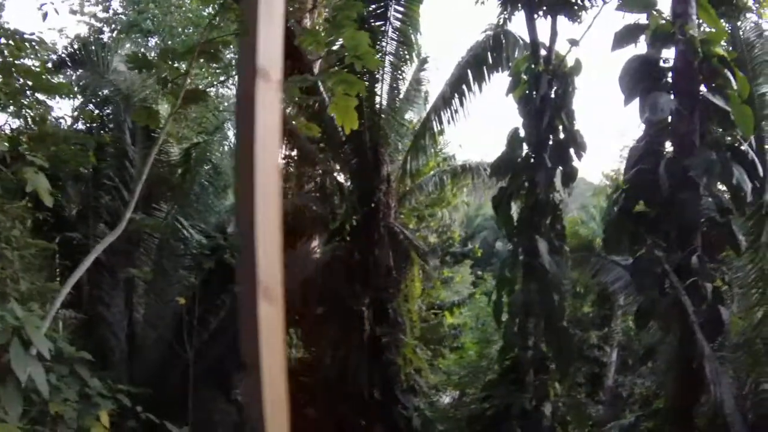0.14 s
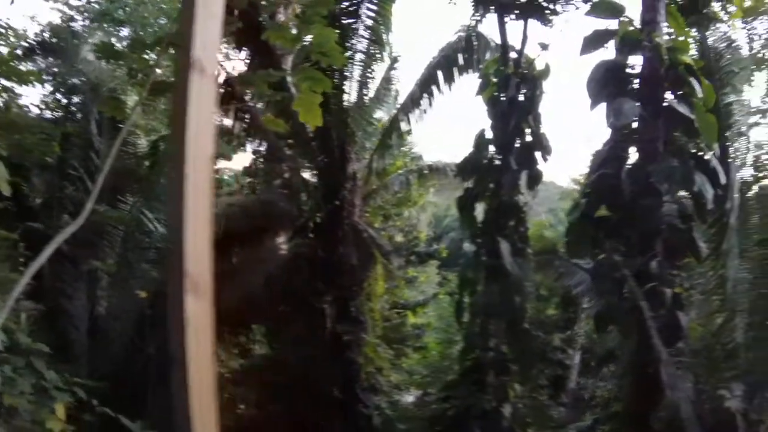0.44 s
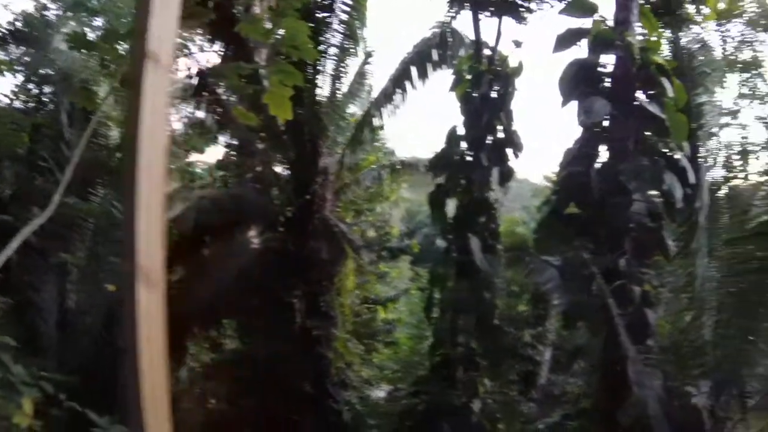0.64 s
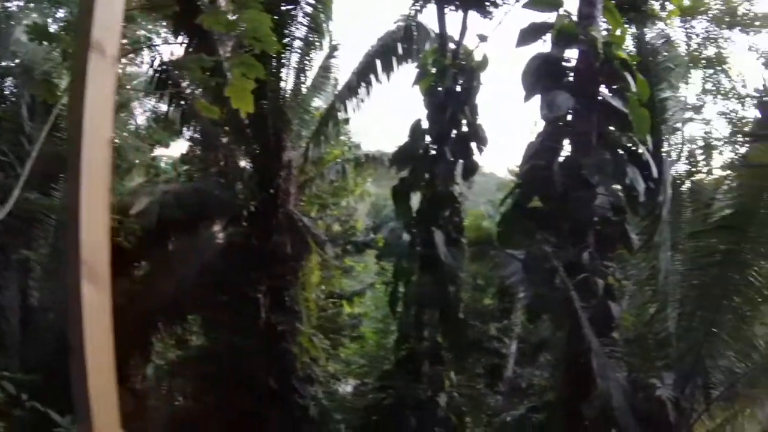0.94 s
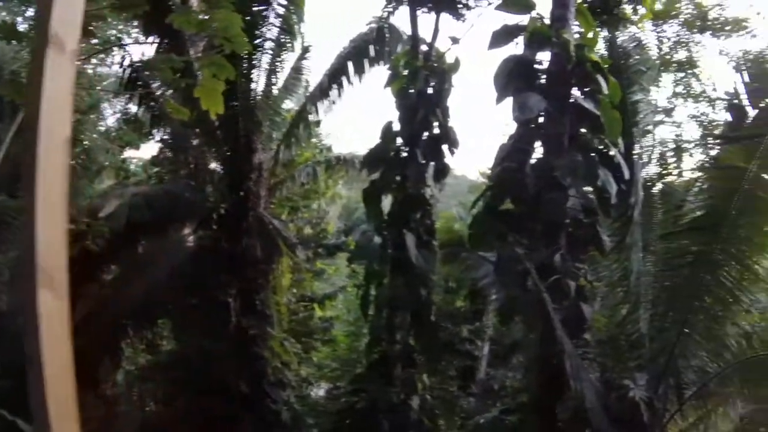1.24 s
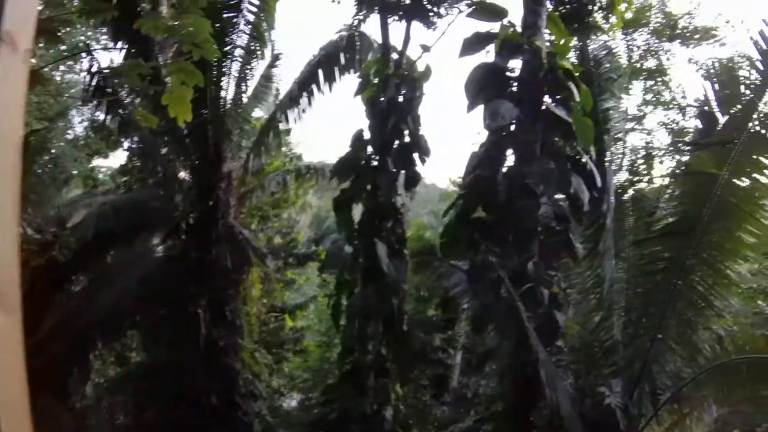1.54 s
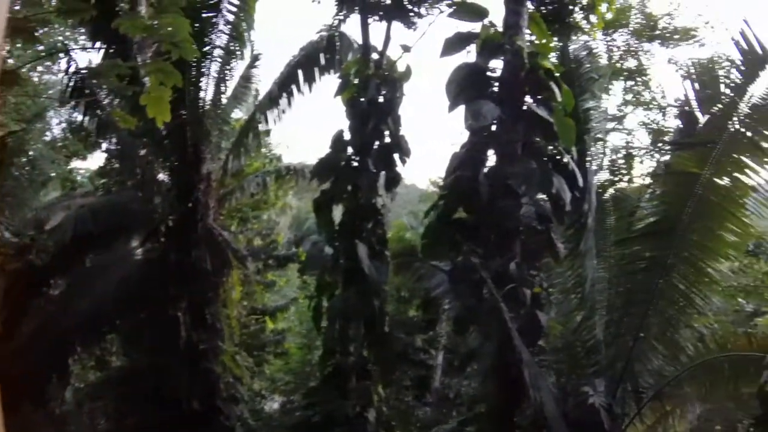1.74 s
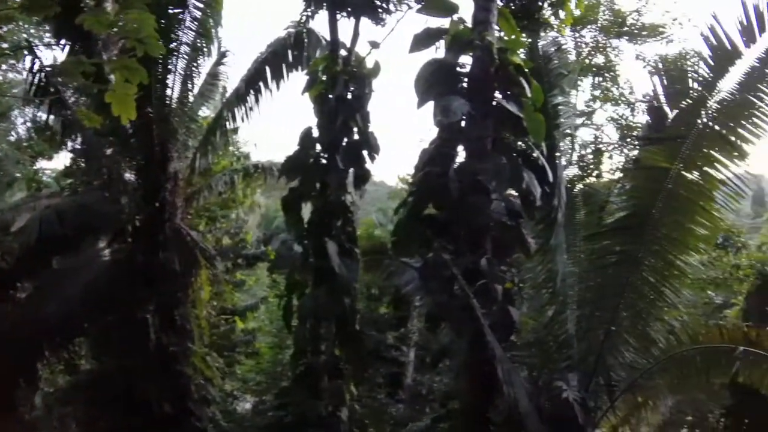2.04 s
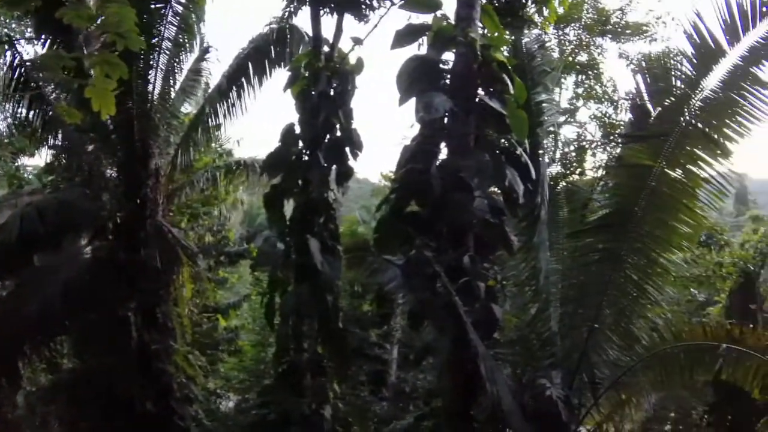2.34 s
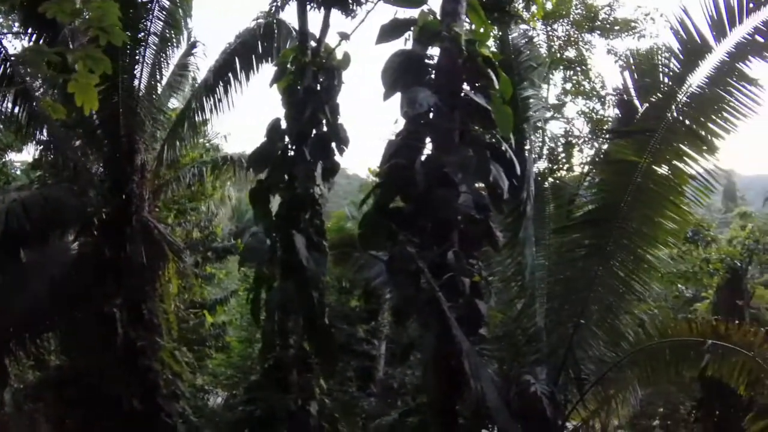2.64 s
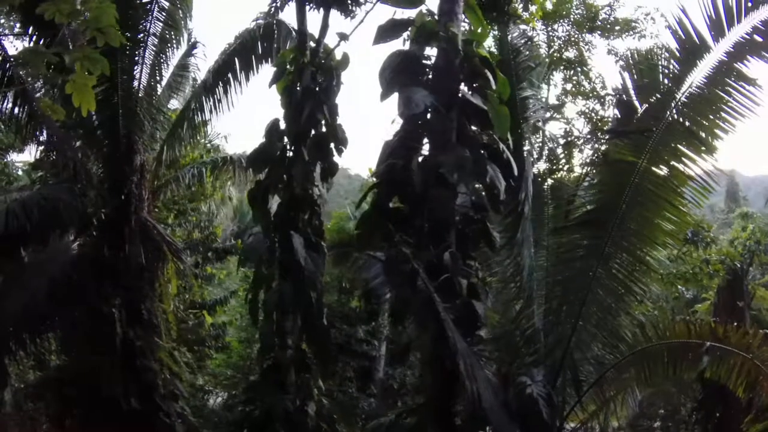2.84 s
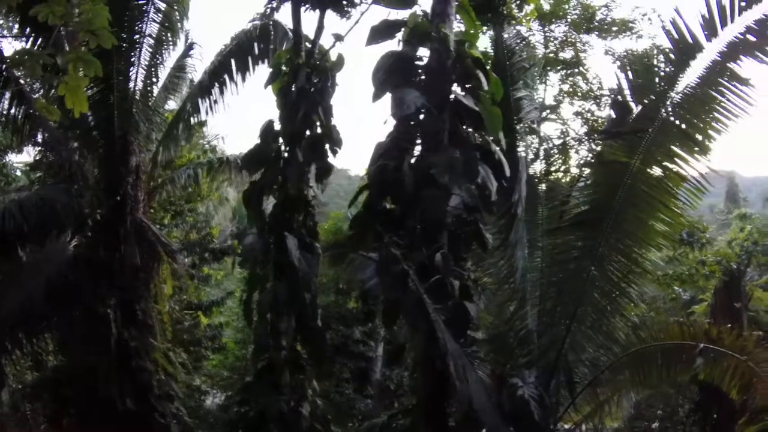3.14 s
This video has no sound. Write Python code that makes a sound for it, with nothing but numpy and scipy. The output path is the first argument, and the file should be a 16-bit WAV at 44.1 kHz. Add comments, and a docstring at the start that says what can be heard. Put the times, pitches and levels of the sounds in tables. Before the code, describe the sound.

Distant howler monkeys roar hoarsely and hoot over a steady, piercing insect drone in tropical forest

```python
"""Howler monkeys in a tropical forest

Far-off monkeys give hoarse roars (rough flaps and air ringing a throat) and hoots (unsteady tones),
both smeared by the trees. Insects drone near 2 kHz as fluttering tones; higher cicadas and crickets
shimmer as coloured noise. Broad noise makes the forest's wash and the low rumble of a hand-held camera,
and fading low sines make its few soft bumps."""
import sys
import numpy as np
from scipy import signal
from scipy.fft import rfft, irfft, next_fast_len
from scipy.io import wavfile
from scipy.ndimage import map_coordinates

SR = 44100
rng = np.random.default_rng(int(sys.argv[2]) if len(sys.argv) > 2 else 0)


def pcm_store(signal):
    """Save signal as 16-bit PCM."""
    levels = np.round(np.clip(np.atleast_2d(signal), -1, 1) * 32767)
    wavfile.write(sys.argv[1], SR, levels.astype(np.int16).T)


N = 144648


def amp(db):
    """Turn decibels into a gain."""
    return 10 ** (np.asarray(db) / 20)


def unit(x):
    """Scale a sound to an average strength (rms) of 1."""
    return x / np.sqrt(np.mean(np.abs(x) ** 2) + 1e-20)


def clock():
    """Give the time of each sample in seconds."""
    return np.arange(N) / SR


def along(points, hz):
    """Read between (frequency, value) points, with frequency on a log axis."""
    f, v = np.transpose(points)
    return np.interp(np.log(hz + 1), np.log(f + 1), v)


def curve(rows):
    """Join (seconds, value) points with straight lines, one value per sample."""
    return np.interp(clock(), *np.transpose(rows))


def wobble(rate):
    """Draw a smooth random curve through `rate` random knots a second."""
    return map_coordinates(rng.standard_normal(4096), [clock() * rate], mode="wrap")


def filtered(x, response):
    """Multiply the spectrum of x by a response that depends on frequency."""
    m = next_fast_len(N + SR // 2)
    return irfft(rfft(x, m) * response(np.fft.rfftfreq(m, 1 / SR)), m)[:N]


def noise(spectrum):
    """Colour white noise with (Hz, dB) points, then scale it to rms 1."""
    return unit(filtered(rng.standard_normal(N), lambda hz: amp(along(spectrum, hz))))


def tone(pitch_hz, spread_hz, rough):
    """Make a tone of rms 1 whose rough share flutters at random in level and phase."""
    m = next_fast_len(N)
    # Slow random flutter: a wider bell in frequency makes it faster
    bell = np.exp(-(np.fft.fftfreq(m, 1 / SR) / (2 * spread_hz)) ** 4)
    random_spectrum = rng.standard_normal(m) + 1j * rng.standard_normal(m)
    flutter = unit(np.fft.ifft(bell * random_spectrum)[:N])
    share = np.clip(rough, 0, 1)
    turns = np.cumsum(pitch_hz * np.ones(N)) / SR + rng.random()
    steady_and_rough = np.sqrt(1 - share) + np.sqrt(share) * flutter
    return unit(np.real(steady_and_rough * np.exp(2j * np.pi * turns)))


def swell(start, length):
    """Shape one call: a straight rise, a hold, then an exponential release."""
    attack_s, release_s = 0.035, 0.031  # release: time to fall to 37 %
    t = clock() - start
    return np.clip(t / attack_s, 0, 1) * np.exp(-np.maximum(t - length, 0) / release_s)


def throat(x, resonances):
    """Ring x through steep-sided resonances, as air in a throat does, at rms 1."""
    def ring(f, hz, width):
        # Squaring makes the sides steeper
        return (1j * f * width / (hz * hz - f * f + 1j * f * width)) ** 2

    def response(f):
        power = sum(np.abs(amp(db) * ring(f, hz, width)) ** 2 for hz, width, db in resonances)
        return np.sqrt(power)

    return unit(filtered(x, response))


def roars():
    """Irregular flaps of the vocal folds and rushing air ring the throat, tuned anew for each roar."""
    # Hoarse roars. Each row: start in seconds, length in seconds, level in dB,
    # middle over lower resonances in dB, upper over lower resonances in dB, main resonance in Hz.
    roar_rows = [(-.05, 0.094, -40.5, -3.5, 8.5, 681), (.06, .2, -53.5, -1, 2.5, 657.4),
                 (1.897, 0.071, -40, -4.5, 6, 659.2), (1.97, 0.13, -44, 1.5, 7, 681),
                 (2.083, 0.1, -38, -11, -1, 667), (2.23, 0.11, -51.5, 1, -6.5, 701),
                 (2.912, .09, -36.5, -3.5, -0.5, 653.5), (3.038, 0.12, -44.5, -1, -4, 653.4),
                 (3.128, .17, -35, -6, 2, 652.6)]
    # Throat resonances before each roar retunes them.
    # Each row: frequency in Hz, width in Hz before the sides are steepened, relative level in dB.
    low_rows = [(481, 150, -1.5), (579, 120, -3), (657, 59, 3.5), (796, 220, -9)]
    mid_rows = [(950, 50, -9), (1040, 80, -2), (1140, 70, 0), (1265, 60, -8)]
    high_rows = [(1545, 60, -9), (1630, 60, -2), (1765, 85, 0), (1900, 70, -10)]
    flap_hz, scatter_cycles, air = 94.3, 0.1518, 0.79  # air: rms beside flaps of rms 1
    untuned_hz = 660  # main resonance before retuning

    count = 1024
    times = (np.arange(count) + scatter_cycles * rng.standard_normal(count)) / flap_hz
    sizes = amp(2 * rng.standard_normal(count))
    flaps = np.bincount(np.abs(times * SR).astype(int), sizes, N)[:N]
    rasp = unit(flaps) + air * rng.standard_normal(N)
    low, mid, high = (throat(rasp, rows) for rows in (low_rows, mid_rows, high_rows))
    samples = np.arange(N)
    out = np.zeros(N)
    for start, length, db, mid_db, high_db, throat_hz in roar_rows:
        mixed = low + amp(mid_db) * mid + amp(high_db) * high
        # Reading faster or slower shifts the resonances, and the flaps with them
        voice = np.interp(samples * throat_hz / untuned_hz % N, samples, mixed)
        out += amp(db) * swell(start, length) * unit(voice)
    return out


def forest(x):
    """Trunks and leaves scatter a call into a long tail, made here from fading noise."""
    # How long the tail lasts. Each row: frequency in Hz, time to fade by 60 dB in seconds.
    fade_times = [(100, 0.3), (500, 1.03), (1500, 1.5), (4000, 0.74)]
    hz, t, z = signal.stft(rng.standard_normal(SR), SR, nperseg=256)
    fade = amp(-60 * t / along(fade_times, hz)[:, None])
    tail = signal.istft(z * fade, SR, nperseg=256)[1]
    return signal.fftconvolve(x, tail / np.linalg.norm(tail))[:N]


def drone():
    """A lead insect and its neighbours sing close in pitch and beat against each other."""
    # Pitch of the lead insect. Each row: time in seconds, pitch in Hz.
    lead_pitch = [(0, 2226), (.4, 2204), (.8, 2223), (1.1, 2232), (1.5, 2196), (2.05, 2235), (2.5, 2215),
                  (3.28, 2211)]
    # Levels of the lead and of its neighbours together. Each row: time in seconds, level in dB.
    lead_level = [(0, -46), (.2, -32), (.55, -39.5), (.7, -49), (1.0, -34.5), (1.2, -34), (1.5, -35),
                  (2.0, -33), (2.35, -35), (2.5, -39.5), (2.95, -40.5), (3.28, -36)]
    chorus_level = [(0, -33), (.22, -28), (.43, -29), (.53, -32), (.63, -28.5), (.82, -29.5), (1.03, -34),
                    (1.25, -31.5), (1.7, -32.5), (2.0, -31), (2.5, -32), (3.0, -31), (3.28, -27.5)]
    # Neighbours that drift with the lead.
    # Each row: mean pitch in Hz, flutter spread in Hz, relative level in dB, roughness from 0 to 1.
    chorus_rows = [(2147, 9, -3, .45), (2120, 12, -9.5, .8), (2090, 10, -8.5, .7)]
    # Farther insects, drifting too.
    # Each row: mean pitch in Hz, flutter spread in Hz, level in dB before their shared change.
    far_rows = [(1370, 14, -70.5), (1555, 20, -64), (1745, 18, -55), (1819, 6, -57.5), (1875, 16, -60),
                (1960, 28, -54), (2166, 72, -44.5), (2305, 29, -59.5), (2498, 30, -51), (2620, 9.5, -56.5),
                (2650, 33, -61.5), (2810, 41, -63.5), (2912, 15, -62), (3096, 19, -65), (3917, 23, -63),
                (4870, 26, -71.5), (8070, 15, -60.5), (8630, 24, -78.5)]
    # Shared level change of the farther insects. Each row: time in seconds, change in dB.
    far_level = [(0, 2), (1.1, 2.1), (1.45, 1.2), (2.2, -0.1), (2.7, 1), (3.28, -0.1)]

    pitch = curve(lead_pitch)
    drift = pitch / pitch.mean()
    lead = amp(curve(lead_level)) * tone(pitch, spread_hz=11.6, rough=0.32)
    chorus = unit(sum(amp(db) * tone(hz * drift, spread, rough) for hz, spread, db, rough in chorus_rows))
    far = sum(amp(db) * tone(hz * drift, spread, rough=0.95) for hz, spread, db in far_rows)
    return lead + amp(curve(chorus_level)) * chorus + amp(curve(far_level)) * far


def shimmer():
    """Countless high cicadas and crickets merge into a hiss that flutters slightly in level."""
    # Colour of the hiss. Each row: frequency in Hz, relative level in dB per Hz.
    hiss_colour = [(4700, -65.5), (5200, -29), (5600, -20.5), (5850, -19), (6150, -11), (6350, -10),
                   (6600, -17), (7020, -1.5), (7300, 1), (7560, -3), (7850, -18.5), (8150, -10.5),
                   (8420, -54), (9000, -70.5)]
    level_db, flutter_db = -39, 0.3
    return amp(level_db + flutter_db * wobble(64)) * noise(hiss_colour)


def wash():
    """Steady broad noise stands for the whole forest, with the camera's low rumble at its bottom end."""
    # Colour of the wash. Each row: frequency in Hz, relative level in dB per Hz.
    wash_colour = [(15, -2.5), (40, 0.5), (100, -5), (200, -6), (400, -10), (800, -17), (1300, -19),
                   (1700, -11), (2400, -11.5), (3000, -11.5), (3800, -11), (4600, -20), (5100, -26.5),
                   (8400, -33), (10000, -35.5), (13000, -43), (14500, -35.5)]
    return amp(-49.5) * noise(wash_colour)


def hoots():
    """Nearly pure notes with weak overtones and a slightly unsteady pitch."""
    # Hooted notes. Each row: start in seconds, length in seconds, level in dB, growth to the end in dB,
    # first pitch in Hz, last pitch in Hz, roughness of the fundamental from 0 to 1.
    hoot_rows = [(.005, 0.14, -43, 0.5, 368, 373, 0.37), (0.203, 0.15, -40.5, -4.5, 370, 368.6, 0.12),
                 (1.902, .05, -40.5, 3.8, 363.5, 369, 0.27), (2, 0.065, -39, -5, 378, 363, .2),
                 (2.038, 0.063, -40, 1.5, 724, 699, 0), (2.107, 0.17, -38.5, 2, 474, 464.8, 0.1),
                 (2.125, 0.079, -39, -2, 668, 646, .4), (2.298, 0.18, -49, -2, 622, 603, 0.5),
                 (3.102, 0.24, -42.5, 14.5, 482, 462, 0.37)]
    # Strength of each harmonic, from the fundamental up. Each entry: level in dB.
    harmonic_levels = [-2.5, -24.5, -25.5, -14]
    out = np.zeros(N)
    for start, length, db, growth_db, first_hz, last_hz, rough in hoot_rows:
        progress = np.clip((clock() - start) / length, 0, 1)
        glide = first_hz + (last_hz - first_hz) * progress
        pitch = glide * (1 + 0.008 * wobble(40))
        # Higher harmonics are rougher
        voice = sum(amp(level_db) * tone(k * pitch, spread_hz=14.7, rough=k * rough)
                    for k, level_db in enumerate(harmonic_levels, 1))
        out += amp(db + growth_db * progress) * swell(start, length) * voice
    return out


def bumps():
    """Dull knocks as the camera is turned: low sines that rise softly and die away."""
    # Soft bumps. Each row: start in seconds, pitch in Hz, level in dB before the soft rise and the decay,
    # time to fade by 60 dB in seconds.
    bump_rows = [(2.352, 107.3, -29.5, 0.2), (2.44, 112.4, -39, 0.34), (2.48, 47.2, -40.5, 0.54),
                 (2.89, 51.73, -30, 0.18)]
    rise_s = 0.028
    out = np.zeros(N)
    for start, hz, db, t60 in bump_rows:
        t = np.maximum(clock() - start, 0)
        rise = 1 - np.exp(-(t / rise_s) ** 2)
        out += amp(db - 60 * t / t60) * rise * np.sin(2 * np.pi * hz * t)
    return out


def scene():
    """Mix the distant monkeys, direct and scattered, with the insects, the wash and the bumps."""
    direct_db, roar_forest_db, hoot_forest_db = -0.5, -3.5, -7
    roar, hoot = roars(), hoots()
    direct = amp(direct_db) * (roar + hoot)
    scattered = forest(amp(roar_forest_db) * roar + amp(hoot_forest_db) * hoot)
    return (direct + scattered + drone() + shimmer() + wash() + bumps())[None]


def record(dry):
    """The camera keeps nothing above its band limit of 15200 Hz."""
    return filtered(dry[0], lambda hz: hz < 15200)[None]


dry = scene()
out = record(dry)
pcm_store(out)
```